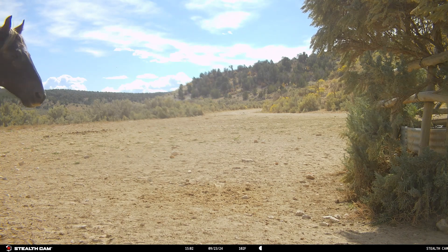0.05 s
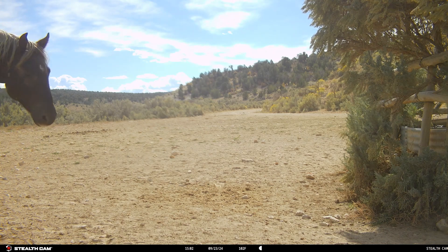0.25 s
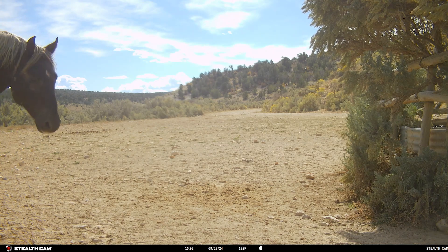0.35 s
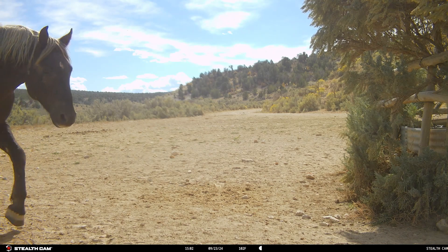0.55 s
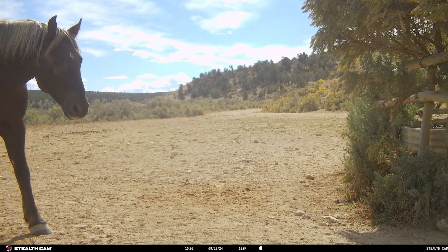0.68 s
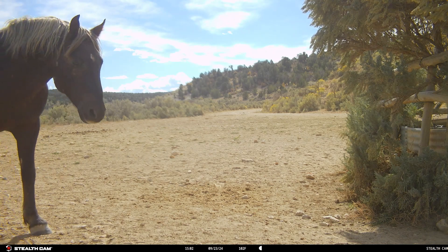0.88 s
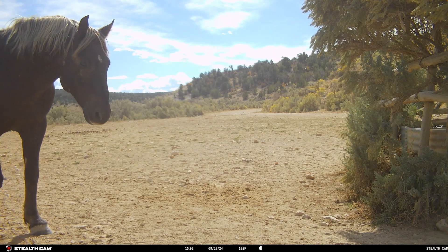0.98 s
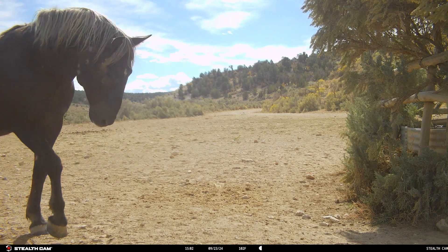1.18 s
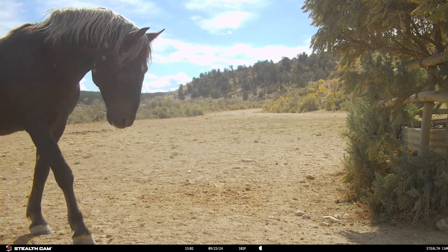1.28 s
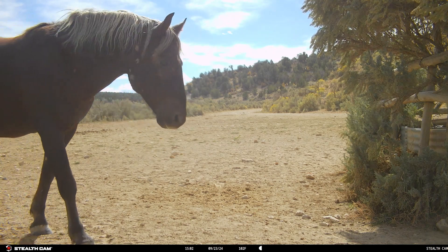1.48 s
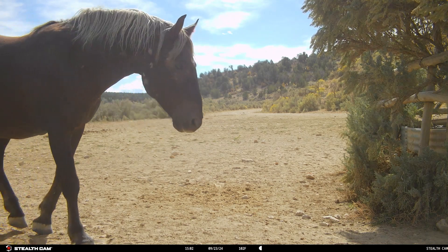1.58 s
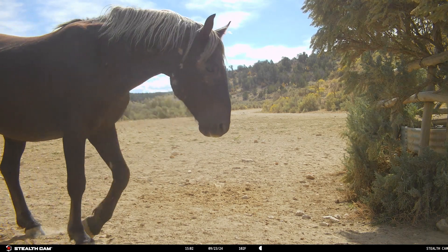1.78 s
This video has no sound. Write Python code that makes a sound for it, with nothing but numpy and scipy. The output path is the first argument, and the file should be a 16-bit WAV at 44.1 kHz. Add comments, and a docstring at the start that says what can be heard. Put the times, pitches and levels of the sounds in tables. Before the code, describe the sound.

A horse squeals once, loud and harsh, then wind buffets the microphone.

```python
"""A horse squeals once, close by, in a dry open field. The call bursts out as a harsh rasp, air chopped by
flapping throat tissue, over a rough voice. A shrill whistle, a second oscillator in the larynx, takes
over and swells; then the voice sinks into a grunt and a puff. Afterwards a gust buffets the microphone
and a far bird chirps once, faintly."""
import sys
import numpy as np
from scipy import signal
from scipy.fft import rfft, irfft
from scipy.io import wavfile
from scipy.ndimage import uniform_filter1d

SR = 44100
rng = np.random.default_rng(int(sys.argv[2]) if len(sys.argv) > 2 else 0)


def persist_wave(psi):
    """Save psi, clipped to +-1, as 16-bit WAV."""
    counts = np.round(np.clip(psi, -1, 1) * 32767).astype(np.int16)
    wavfile.write(sys.argv[1], SR, np.atleast_2d(counts).T)


N = 81585
T = np.arange(N) / SR
HZ = np.fft.rfftfreq(N, 1 / SR)


def amp(db):
    """Decibels to gain."""
    return 10 ** (np.asarray(db) / 20)


def unit(x):
    """Scale to rms 1."""
    return x / np.sqrt(np.mean(abs(x) ** 2) + 1e-20)


def follow(table):
    """Each column after the time, interpolated per sample."""
    times, *columns = np.transpose(table)
    return [np.interp(T, times, column) for column in columns]


def during(table, edge_s):
    """Gate, open over the table's time span."""
    return np.clip(1 + (T - table[0][0]) / edge_s, 0, 1) * np.clip(1 + (table[-1][0] - T) / edge_s, 0, 1)


def arch(start_s, length_s):
    """Rounded swell."""
    return np.sqrt(abs(np.sin(np.pi * np.clip((T - start_s) / length_s, 0, 1))))


def crossfade(before, after, mid_s, length_s):
    """Linear fade between two signals."""
    share = np.clip(.5 + (T - mid_s) / length_s, 0, 1)
    return (1 - share) * before + share * after


def coloured(x, colour):
    """Filter x by a spectral curve; rms 1."""
    hz, db = np.transpose(colour)
    return unit(irfft(rfft(x) * amp(np.interp(np.log(HZ + 1), np.log(hz), db)), N))


def wander(rate_hz):
    """Smooth random motion up to a rate; rms 1."""
    return unit(irfft(rfft(rng.standard_normal(N)) / (1 + (HZ / rate_hz) ** 4), N))


def phase(hz):
    """Running angle of a pitch curve."""
    return 2 * np.pi * np.cumsum(hz) / SR


def resonate(x, hz, width_hz):
    """Steep moving resonance; rms 1."""
    carrier = np.exp(1j * phase(hz))
    pole = np.exp(-np.pi * width_hz / SR)
    baseband = signal.lfilter([(1 - pole) ** 2], [1, -2 * pole, pole * pole], x / carrier)
    return unit((carrier * baseband).real)


# Each row: frequency in Hz, relative level in dB.
AIR_COLOUR = [(59, -31.5), (100, -16), (213, -15), (772, -21), (833, -19.5), (1060, -23), (1130, -22),
              (1580, -26), (1810, -26), (3930, -31), (9210, -43.5), (12000, -66), (20300, -120)]


def still_air(level_db=-52.5):
    """Steady faint noise of the field."""
    return amp(level_db) * coloured(rng.standard_normal(N), AIR_COLOUR)


def bird(start_s=1.578, length_s=.042, hz=7650, level_db=-58.5):
    """One thin, quavering chirp, far off."""
    tone = resonate(rng.standard_normal(N), np.full(N, hz), width_hz=700)
    return amp(level_db) * arch(start_s, length_s) * tone


# Low buffeting and fine turbulence. Each row: time in seconds, level in dB.
RUMBLE_DB = [(0, -51), (.1, -62), (.155, -34), (.21, -58), (.86, -50), (1.0, -52), (1.07, -35),
             (1.13, -53.5), (1.24, -37), (1.295, -21.5), (1.375, -17), (1.41, -21.5), (1.44, -12.5),
             (1.48, -21), (1.54, -16), (1.62, -24.5), (1.68, -23.5), (1.72, -28.5), (1.79, -25.5),
             (1.85, -21)]
ROAR_DB = [(1.3, -65), (1.38, -39), (1.45, -36), (1.54, -40), (1.62, -54), (1.76, -66), (1.835, -48)]
# Rumble brightness. Each row: time in seconds, low-pass corner in Hz.
RUMBLE_CORNER_HZ = [(1.2, 30.3), (1.35, 62.5), (1.45, 145), (1.55, 157), (1.66, 98.4), (1.75, 108),
                    (1.85, 190)]
# Each row: frequency in Hz, relative level in dB.
ROAR_COLOUR = [(60, -33), (300, 10.5), (550, -1.5), (900, -7), (1400, -20), (2500, -46.5), (6000, -52.5)]
# Gaps between eddies. Each row: start in seconds, length in seconds, gain in dB.
LULLS = [(1.392, .03, -7), (1.69, .022, -12)]


def wind(low_cut_hz=20.75, lowpass_order=3.05, flutter_octaves=.083, lump_db=.5):
    """Eddies on the microphone: a lumpy rumble that brightens as the gust grows."""
    corner_octave = np.log2(follow(RUMBLE_CORNER_HZ)[0]) + flutter_octaves * wander(40)
    eddies = rfft(rng.standard_normal(N)) * HZ / np.hypot(HZ, low_cut_hz)
    rumble = np.zeros(N)
    for octave in range(3, 11):
        lowpassed = unit(irfft(eddies / np.hypot(1, (HZ / 2 ** octave) ** lowpass_order), N))
        rumble += np.maximum(1 - abs(corner_octave - octave), 0) * lowpassed
    rumble *= amp(follow(RUMBLE_DB)[0])
    roar = coloured(rng.standard_normal(N), ROAR_COLOUR) * amp(follow(ROAR_DB)[0]) * during(ROAR_DB, .1)
    lull_db = sum(db * arch(start_s, length_s) for start_s, length_s, db in LULLS)
    return (rumble + roar) * amp(lull_db + lump_db * wander(28.44))


# Each row: start in seconds, length in seconds, pitch in Hz, glide in octaves per second, level in dB.
GRUNTS = [(.174, .1, 122, .2, -26.5), (.265, .075, 370, 2, -40), (.32, .12, 170, .2, -35),
          (.905, .085, 325, -11.5, -39), (1.098, .026, 150, -2, -31.5)]


def grunt(start_s, length_s, hz, octaves_per_s, level_db, jitter=.13, shimmer=.062):
    """Low, unsteady vibration from the chest."""
    glide_hz = hz * 2 ** (octaves_per_s * np.clip(T - start_s, 0, length_s))
    angle = phase(glide_hz * (1 + jitter * wander(hz)))
    tone = np.sin(angle) + np.sin(2 * angle) + amp(-29.5) * np.sin(3 * angle)
    return amp(level_db) * arch(start_s, length_s) * unit(tone * (1 + shimmer * wander(hz)))


def puff(start_s, level_db, decay_s, colour, rise_s=.0007):
    """Short release of air: quick rise, exponential decay."""
    envelope = np.clip((T - start_s) / rise_s, 0, 1) * np.exp(-abs(T - start_s) / decay_s)
    return amp(level_db) * envelope * coloured(rng.standard_normal(N), colour)


# A soft pop, then a sharp click. Each row: start in seconds, level in dB, decay in seconds.
SNAPS = [(1.101, -31, .003), (1.1083, -22.5, .004)]
# Each row: frequency in Hz, relative level in dB.
SPRAY_COLOUR = [(1500, -27.5), (2100, -2), (2700, 1), (3600, -21), (4450, -7), (5200, -0.5), (5900, 7.5),
                (6600, -13.5), (7700, -12), (9300, -30), (11000, -56.5)]
SNAP_COLOUR = [(40, -8), (200, 4), (550, 7), (850, -10), (1250, -2), (2000, 1), (2900, 0), (3800, 1.5),
               (4400, -18), (5700, -9), (6600, -36), (10000, -59)]


def throat_puffs():
    """A treble spray as the call bursts out; the throat pops open at its end."""
    spray = puff(start_s=.179, level_db=-29.5, decay_s=.054, colour=SPRAY_COLOUR)
    return spray + sum(puff(*row, SNAP_COLOUR) for row in SNAPS)


def slaps(rate_hz, jitter=.2, spread_db=1.8):
    """One tissue slap per cycle, uneven in time and strength; rms 1."""
    cycles = np.floor(phase(rate_hz * (1 + jitter * wander(rate_hz))) / (2 * np.pi))
    return unit(np.diff(cycles, prepend=0) * amp(spread_db * rng.standard_normal(N)))


# Throat resonances. Each row: time in seconds, centre in Hz, level in dB.
HOLLOW_RING = [(.2, 662, -48), (.24, 660, -28.5), (.3, 669, -43), (.45, 631, -41.5), (.53, 562, -37),
               (.6, 580, -39.5), (.66, 560, -56.5), (.72, 612, -40), (.8, 618, -43), (.86, 593.6, -34.5),
               (.93, 553, -38.5)]
LOW_RING = [(.135, 957, -52), (.15, 965, -31.5), (.175, 1167, -49), (.2, 1270, -28), (.24, 1168, -25.5),
            (.335, 1201, -21.5), (.391, 1149, -12), (.42, 1180, -15), (.445, 1182, -16.5),
            (.48, 1247, -18.5), (0.549, 1194, -29), (.7, 1183, -36.5), (.79, 1082, -47.5), (.819, 980, -33),
            (.86, 926, -56), (.91, 838, -33), (.96, 703, -50.5), (1.01, 712, -69.5), (1.1, 706, -51),
            (1.14, 686, -34), (1.19, 685, -59.5)]
MID_RING = [(.26, 3163, -48), (.3, 3080, -25), (.335, 3050, -24), (.37, 2814, -33), (.5, 3060, -40.5),
            (1.03, 3524, -62.5), (1.05, 3380, -40), (1.066, 2790, -33), (1.085, 2560, -46),
            (1.1, 2325, -66)]
HIGH_RING = [(.165, 4560, -57), (0.183, 4200, -24.5), (0.211, 4340, -20), (0.221, 4000, -15.5),
             (0.256, 4044, -18), (0.276, 4000, -22), (0.341, 3754, -28.5), (.43, 3890, -31.5),
             (0.472, 3860, -26.5), (0.549, 3835, -20.5), (0.603, 3897, -16.5), (.67, 4030, -20),
             (.76, 3980, -29.5), (.84, 4270, -30.5), (.95, 3970, -43.5), (1.02, 3530, -67)]


def throat_rings(flows):
    """Airflow and slaps ring four resonances: slow slaps growl, faster ones buzz."""
    growl, buzz = slaps(rate_hz=128), slaps(rate_hz=225)
    rings = [(HOLLOW_RING, 46, growl, .85), (LOW_RING, 175, growl, .85),
             (MID_RING, 320, buzz, .7), (HIGH_RING, 380, buzz, .7)]
    out = np.zeros(N)
    for flow, (ring, width_hz, kicks, kick_share) in zip(flows, rings):
        hz, db = follow(ring)
        drive = np.sqrt(1 - kick_share) * unit(flow) + np.sqrt(kick_share) * kicks
        out += resonate(drive, hz, width_hz) * amp(db) * during(ring, .048)
    return out


# Each row: time in seconds, level in dB.
HISS_DB = [(.13, -65), (.15, -37.5), (.175, -35), (.184, -29), (.205, -24.5), (.225, -15), (.255, -18.5),
           (.28, -26), (.335, -23.5), (.4, -27.5), (.46, -26.5), (.53, -25), (.62, -31), (.72, -30),
           (.8, -34.5), (.87, -28.5), (.95, -33), (.985, -30), (1.02, -41), (1.04, -42), (1.055, -28),
           (1.095, -44.5), (1.122, -43), (1.138, -37), (1.17, -52), (1.2, -74)]
# Opening burst, held squeal, final outflow. Each row: frequency in Hz, relative level in dB.
BURST_COLOUR = [(40, -33), (200, 9), (450, -13.5), (640, 4.5), (850, 9.5), (1250, -0.5), (1550, 4),
                (1900, 3), (2110, 10), (2400, -1.5), (2750, 7.5), (3500, -2.5), (4100, 9.5), (4600, -5),
                (5200, -6.5), (5850, -8), (6600, -30), (7600, -31), (9300, -49), (11000, -57.5)]
HELD_COLOUR = [(40, -17.5), (250, -2.5), (470, -13), (620, -9.5), (900, -5.5), (1200, -3), (1480, -11),
               (1950, 3), (2150, 5), (2400, 6.5), (3100, 0), (3400, -7), (4000, -5.5), (4600, 1.5),
               (5500, -7), (6400, -10.5), (7400, -29.5), (8800, -41.5), (11000, -70)]
RELEASE_COLOUR = [(40, -16), (250, -15), (550, -1), (900, -15), (1250, 15.5), (1550, -13.5), (2050, 2),
                  (2800, 4.5), (3900, -3.5), (4600, -4), (5500, -5.5), (6500, -21), (7500, -17),
                  (9000, -52), (11000, -64)]


def throat_hiss(flow, patch_db=4):
    """Air through the throat, patchy in time and frequency, in three successive colours."""
    spectrogram = signal.stft(flow, nperseg=1024, noverlap=768)[2]
    patches = uniform_filter1d(rng.standard_normal(spectrogram.shape), size=3, axis=0)
    patches = unit(uniform_filter1d(patches, size=12, axis=1))
    air = signal.istft(spectrogram * amp(patch_db * patches), nperseg=1024, noverlap=768)[1][:N]
    hiss = crossfade(coloured(air, BURST_COLOUR), coloured(air, HELD_COLOUR), mid_s=.393, length_s=.015)
    hiss = crossfade(hiss, coloured(air, RELEASE_COLOUR), mid_s=1.03, length_s=.019)
    return hiss * amp(follow(HISS_DB)[0]) * during(HISS_DB, .02)


def rasp(flap_hz=174, jitter=.3, depth=.45, decay_cycles=.35):
    """Unevenly flapping tissue chops the airflow that feeds the hiss and the resonances."""
    cycle = phase(flap_hz * (1 + jitter * wander(flap_hz))) / (2 * np.pi) % 1
    opening = 1 - depth + depth * np.exp(-cycle / decay_cycles)
    flows = opening * rng.standard_normal((5, N))
    return throat_hiss(flows[0]) + throat_rings(flows[1:])


ROUGHNESS_HZ = 171.3
# Each row: time in seconds, pitch in Hz, level in dB, jitter as a fraction of pitch.
VOICE = [(.205, 595.4, -40, 0.018), (.23, 614.5, -27, 0.015), (.315, 619, -30, 0.041),
         (.365, 644.4, -21.5, 0.013), (.405, 636, -18, 0.0057), (.425, 625, -27, 0.044),
         (.5, 648.3, -23, 0.023), (.57, 649, -19.5, 0.0087), (.64, 642.7, -23.5, 0.0041),
         (.71, 629.3, -23, 0.0079), (.78, 619.2, -28, 0.0081), (.83, 566, -26.5, 0.024),
         (.88, 584, -41, 0.023), (.915, 551.3, -24.5, 0.016), (.955, 510.7, -23, 0.0076),
         (.99, 496.6, -80, 0.029), (1.04, 445.4, -59, 0.023), (1.06, 417, -33.5, 0.0354),
         (1.078, 415.4, -27.5, 0.022), (1.095, 343, -35.5, 0.2)]
# Each row: time in seconds, pressing of the vocal folds from 0 to 1.
FOLD_PRESS = [(.41, 0), (.47, 0.73), (.57, 0.87), (.8, 1), (.86, 0.6), (.95, 0.51), (1.06, 0)]
# Each row: harmonic number, gain in dB when slack, gain in dB when pressed.
VOICE_HARMONICS = [(1, 3, -23.5), (2, -5.5, -3), (3, -12.5, -31.5), (4, -21, -4), (5, -7.5, -21),
                   (6, -37.5, 6), (7, -24, -11.5), (8, -29, -8), (10, -43.5, -29)]


def voice(shimmer=.062):
    """Rough vocal fold tone; pressing favours the upper harmonics. Returns sound and phase."""
    hz, db, jitter = follow(VOICE)
    press = follow(FOLD_PRESS)[0]
    angle = phase(hz * (1 + jitter * wander(ROUGHNESS_HZ)))
    tone = np.zeros(N)
    for k, slack_db, pressed_db in VOICE_HARMONICS:
        gain = amp(slack_db + (pressed_db - slack_db) * press)
        tone += gain * np.sin(k * angle) * (1 + shimmer * wander(ROUGHNESS_HZ))
    return tone * amp(db) * during(VOICE, .023), angle


# Each row: time in seconds, pitch in Hz, levels of harmonics 1, 2 and 3 in dB.
WHISTLE = [(.392, 1725, -31, -47, -40), (.414, 1765, -14.5, -35, -37.5), (.436, 1762, -28, -33, -33.5),
           (.456, 1818, -19, -30, -32.5), (.485, 1850, -26, -21.5, -37), (.52, 1770, -16.5, -26, -22),
           (.55, 1748, -24.5, -34, -54), (.622, 1783, -30, -26.5, -30), (.66, 1708, -15, -34, -54.5),
           (.7, 1802, -21, -28.5, -40), (.74, 1815, -17, -39, -30.5), (.768, 1869, -15.5, -23, -42.5),
           (.806, 1906, -25, -31.5, -34.5), (.838, 1913, -15.5, -27.5, -31), (.858, 1858, -7.5, -29, -31),
           (.9, 1851, -10, -23.5, -32), (.952, 1793, -10.5, -45, -33), (.974, 1783, -13.5, -40, -36.5),
           (.997, 1801, -16.5, -28.5, -24), (1.014, 1811, -26.5, -25.5, -38.5),
           (1.035, 1783, -30, -29, -35), (1.052, 1740, -34, -45, -57), (1.068, 1565, -41, -55, -65)]
# Each row: time in seconds, levels of the three side tones in dB relative to the whistle.
SIDE_TONES_DB = [(.4, -26, -34, -40), (.6, -26, -26, -30), (.67, -30, -27, -40), (.8, -32, -36, -22),
                 (.86, -25, -42, -22), (.905, -17.5, -27, -38), (.955, -14, -32, -38),
                 (.985, -26, -42, -42), (1.03, -34, -42, -42)]
# Flutter of overtones and side tones. Each row: time in seconds, depth as a fraction.
PARTIAL_FLUTTER = [(.4, .25), (.52, .25), (.75, .5), (.93, .42), (.98, .1), (1.04, .1), (1.06, .6)]


def whistle(voice_angle, jitter=.003, shimmer=.06, waver=.0028, waver_hz=35.5, flutter_hz=110):
    """Second oscillator in the larynx; beating against the voice adds side tones."""
    hz, first_db, second_db, third_db = follow(WHISTLE)
    angle = phase(hz * (1 + jitter * wander(ROUGHNESS_HZ) + waver * wander(waver_hz)))
    overtones = [(2 * angle, second_db), (3 * angle, third_db), (4 * angle, third_db - 27)]
    side_angles = (angle + voice_angle, angle - 2 * voice_angle, 3 * angle - voice_angle)
    side_tones = [(side, first_db + db) for side, db in zip(side_angles, follow(SIDE_TONES_DB))]
    depth = follow(PARTIAL_FLUTTER)[0]
    tone = amp(first_db) * np.sin(angle)
    for partial_angle, db in overtones + side_tones:
        flutter = 1 + depth * (wander(flutter_hz) + 1j * wander(flutter_hz))
        tone += amp(db) * (flutter * np.exp(1j * partial_angle)).imag
    return np.sqrt(2) * tone * (1 + shimmer * wander(ROUGHNESS_HZ)) * during(WHISTLE, .018)


def horse():
    """One squeal from larynx, throat and chest."""
    voiced, voice_angle = voice()
    return voiced + whistle(voice_angle) + rasp() + throat_puffs() + sum(grunt(*row) for row in GRUNTS)


def field(x, echo_db=-21, t60_s=.09, low_cut_hz=1300, port_delay_s=1.3e-5):
    """Brief, thin scatter from ground and bushes, heard at two close microphone ports."""
    t = T[:SR // 3]
    taps = rng.standard_normal(len(t)) * (rng.random(len(t)) < .05)
    taps *= (t > .003) * amp(-60 * t / t60_s)
    highpass = signal.butter(2, low_cut_hz, "high", fs=SR, output="sos")
    taps = signal.sosfilt(highpass, taps / np.linalg.norm(taps))
    left = x + amp(echo_db) * signal.fftconvolve(x, taps)[:N]
    right = irfft(rfft(left) * np.exp(-2j * np.pi * HZ * port_delay_s), N)
    return np.array([left, right])


def scene():
    """Horse, bird, wind and still air in the field."""
    return field(horse() + bird() + wind() + still_air())


def record(dry, cutoff_hz=9400, fade_s=.004):
    """Narrow band of a small recorder, with faded ends."""
    fade = np.clip(np.minimum(T, T[-1] - T) / fade_s, 0, 1)
    lowpass = signal.firwin(255, cutoff_hz, window=("kaiser", 9), fs=SR)
    return signal.oaconvolve(dry * fade, lowpass[None], "same")


dry = scene()
out = record(dry)
persist_wave(out)
```